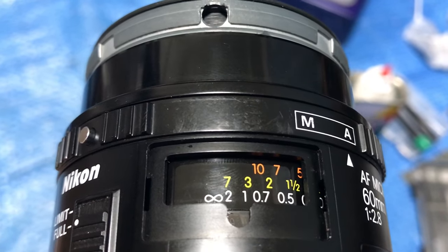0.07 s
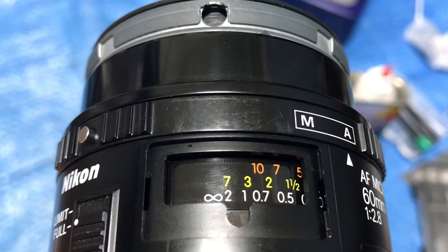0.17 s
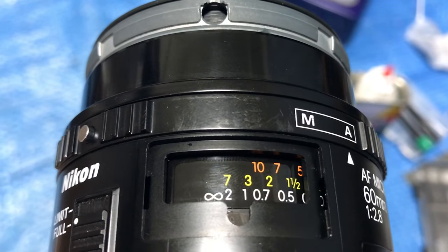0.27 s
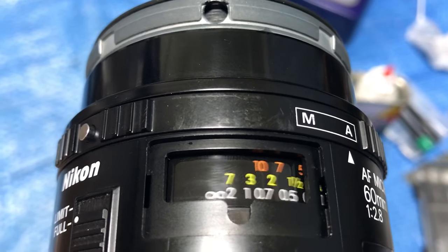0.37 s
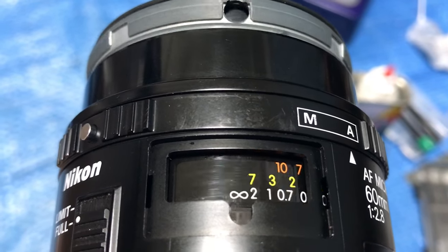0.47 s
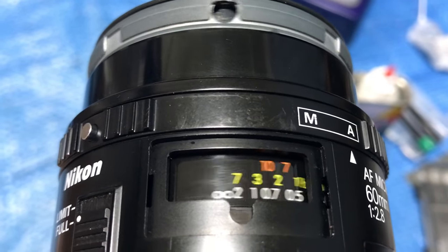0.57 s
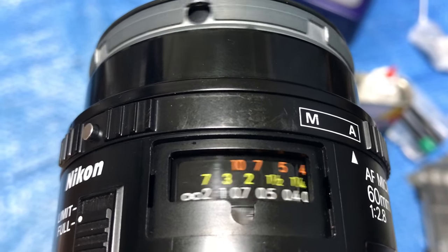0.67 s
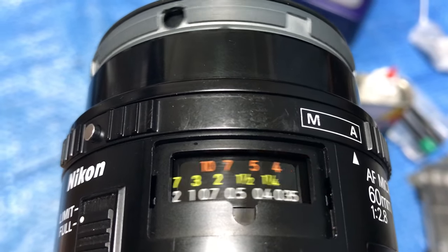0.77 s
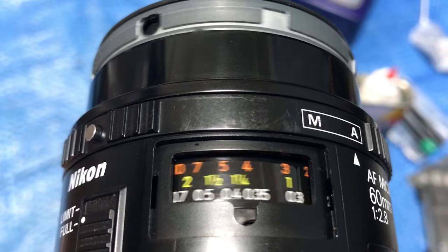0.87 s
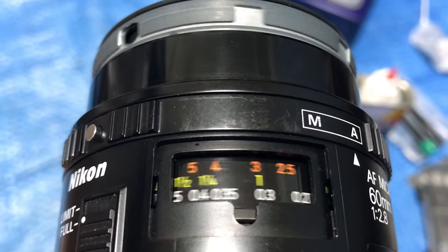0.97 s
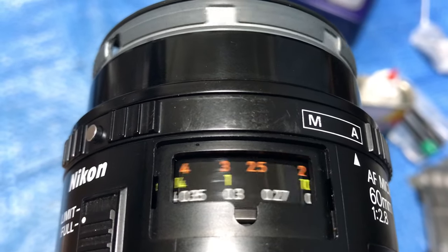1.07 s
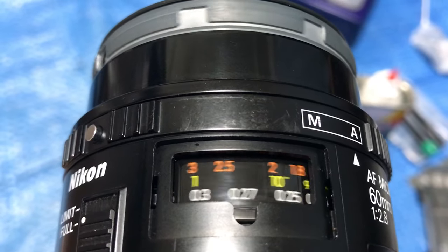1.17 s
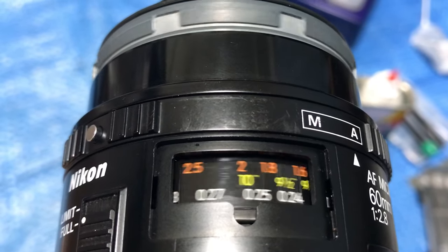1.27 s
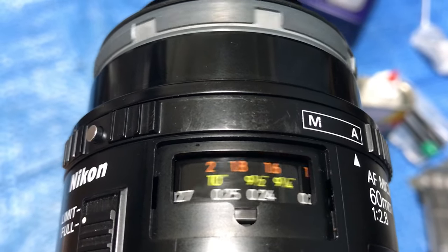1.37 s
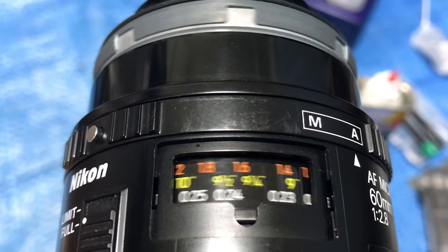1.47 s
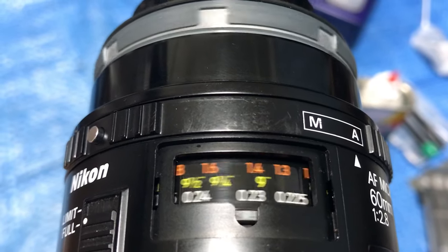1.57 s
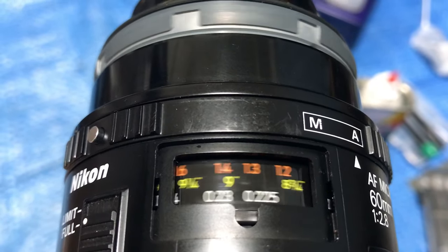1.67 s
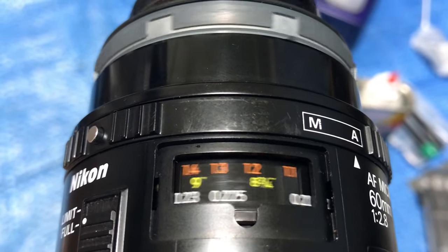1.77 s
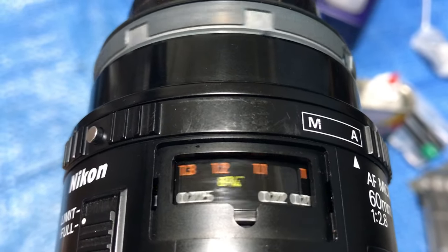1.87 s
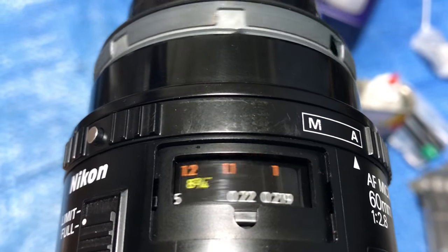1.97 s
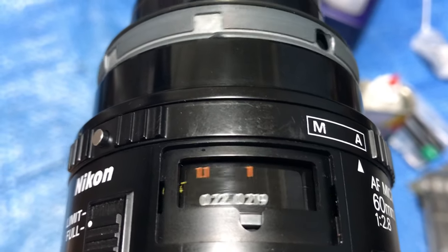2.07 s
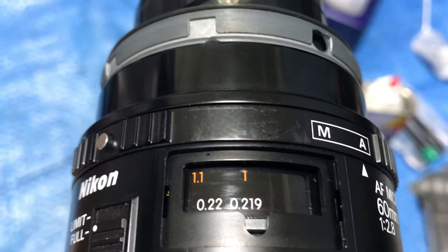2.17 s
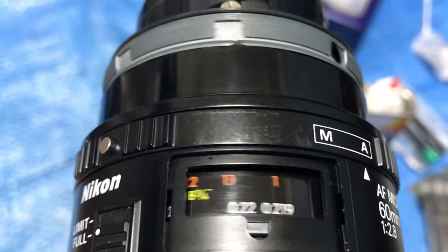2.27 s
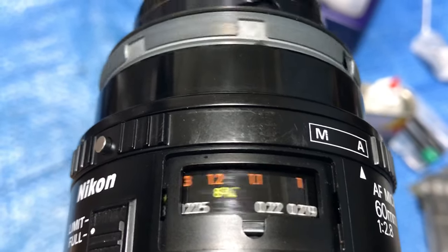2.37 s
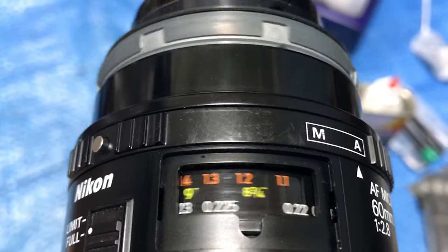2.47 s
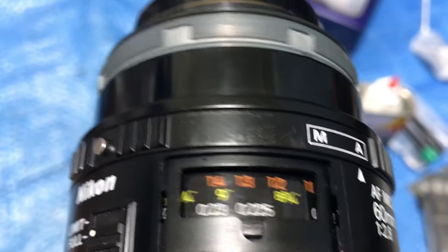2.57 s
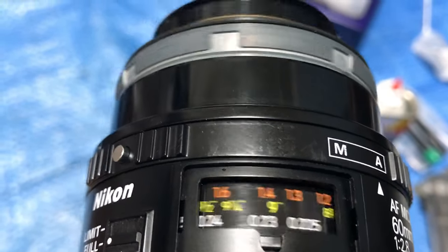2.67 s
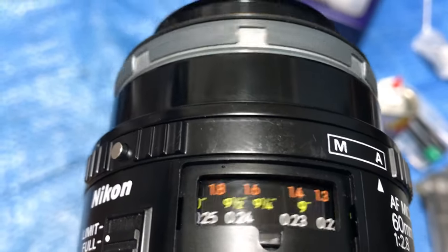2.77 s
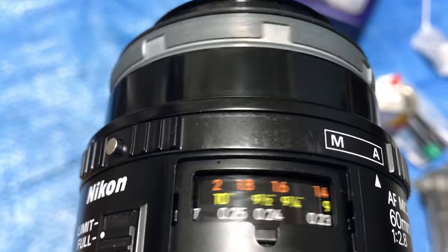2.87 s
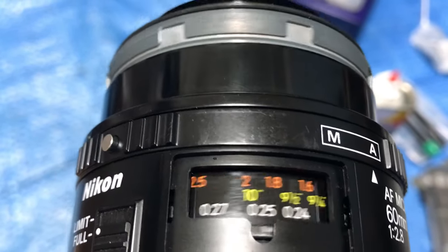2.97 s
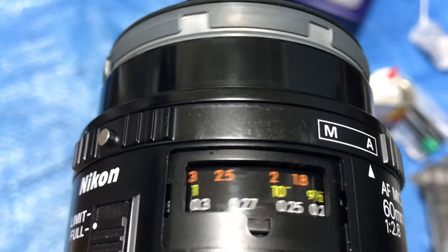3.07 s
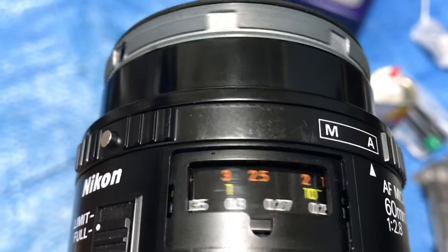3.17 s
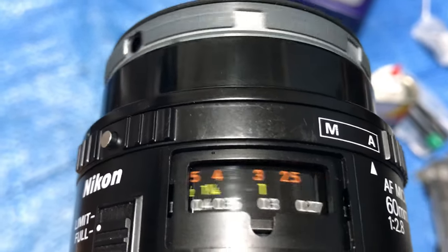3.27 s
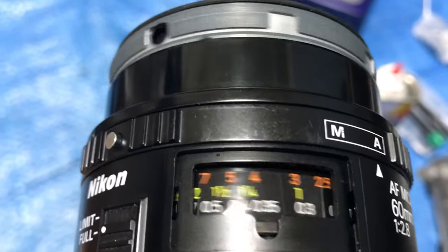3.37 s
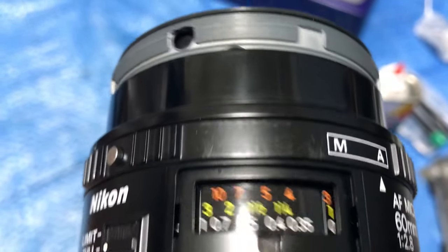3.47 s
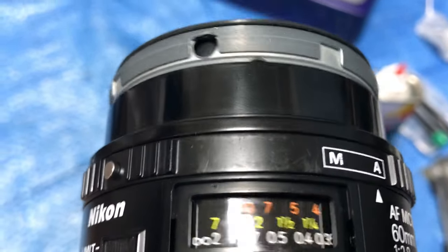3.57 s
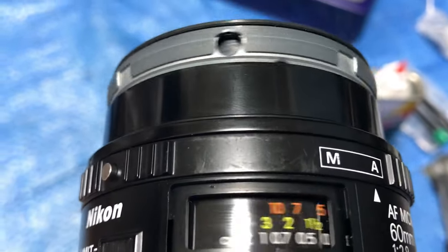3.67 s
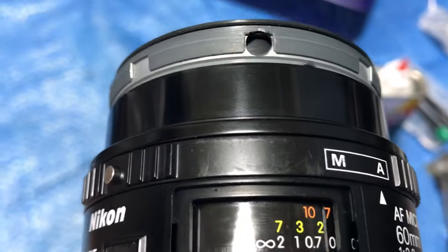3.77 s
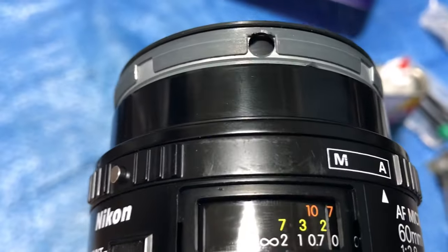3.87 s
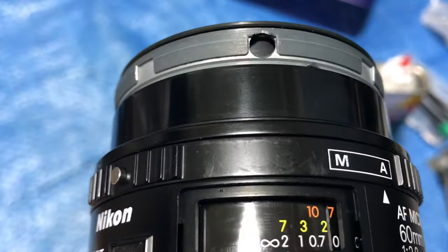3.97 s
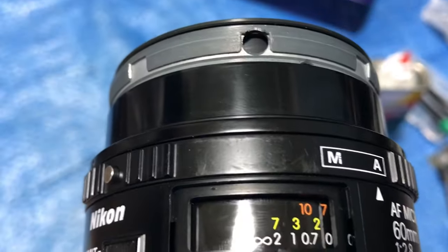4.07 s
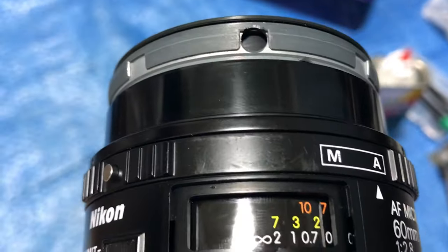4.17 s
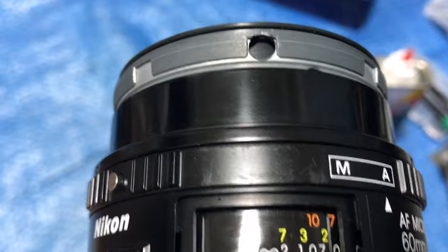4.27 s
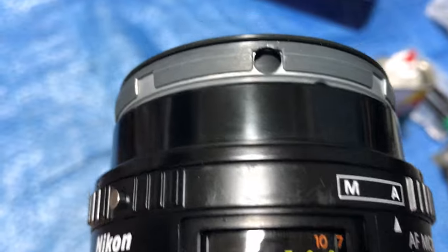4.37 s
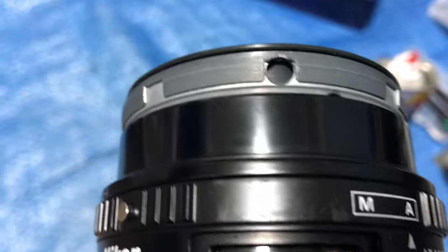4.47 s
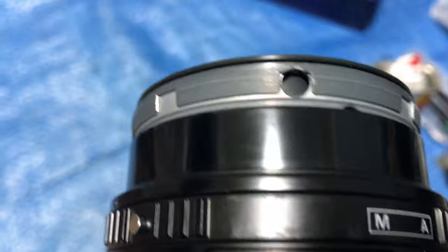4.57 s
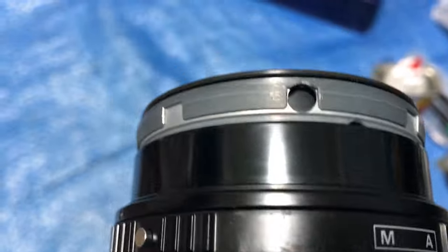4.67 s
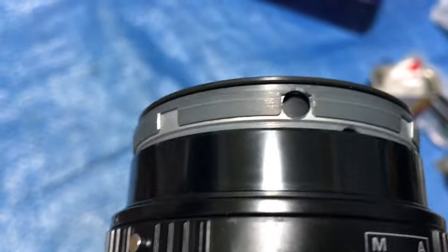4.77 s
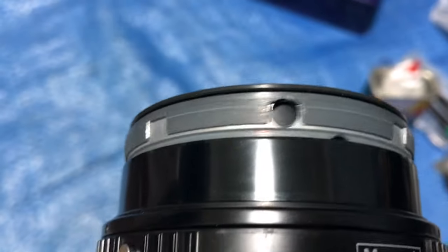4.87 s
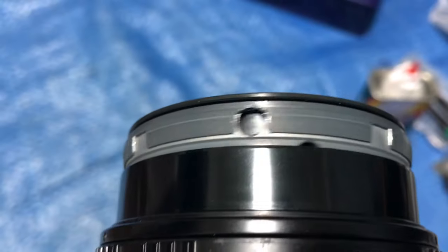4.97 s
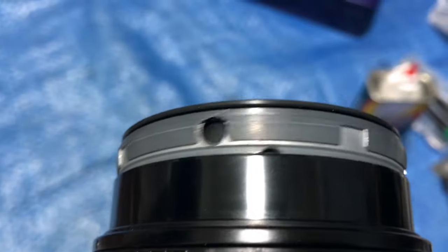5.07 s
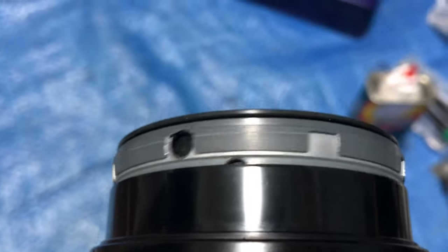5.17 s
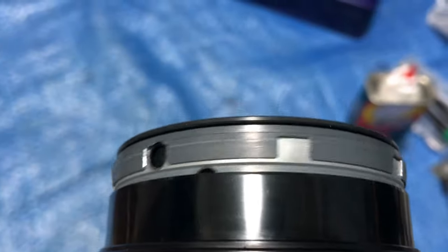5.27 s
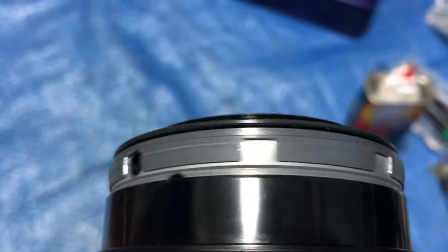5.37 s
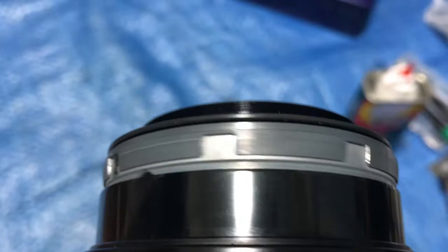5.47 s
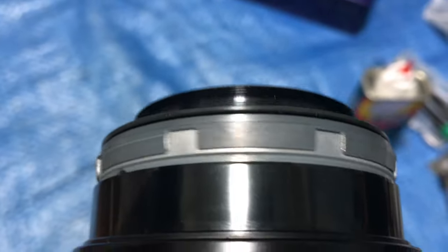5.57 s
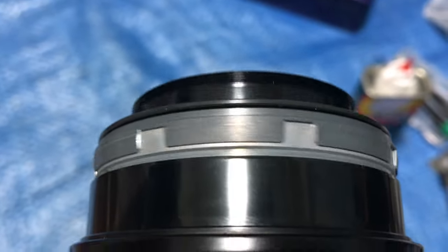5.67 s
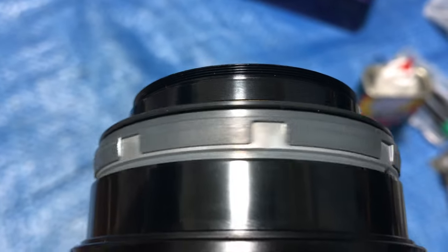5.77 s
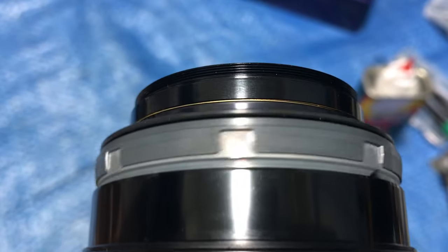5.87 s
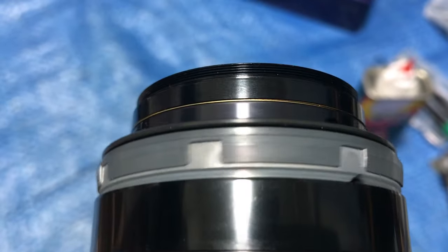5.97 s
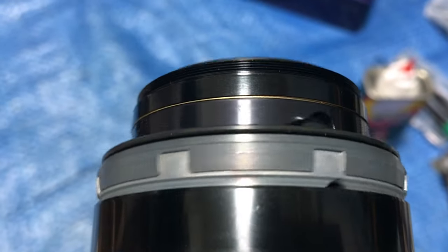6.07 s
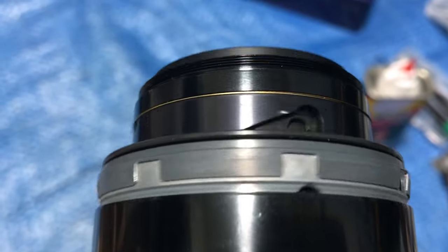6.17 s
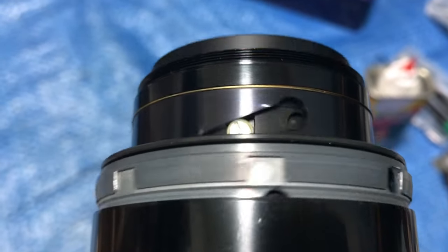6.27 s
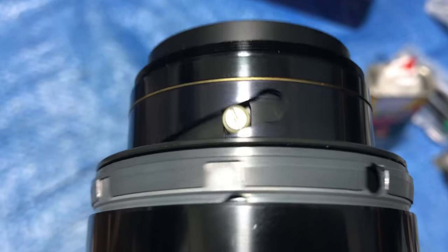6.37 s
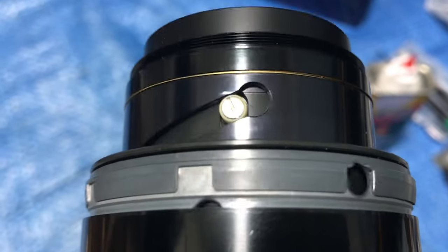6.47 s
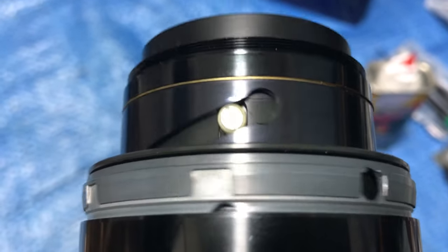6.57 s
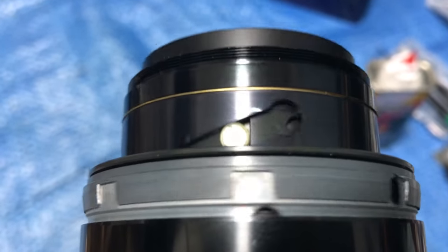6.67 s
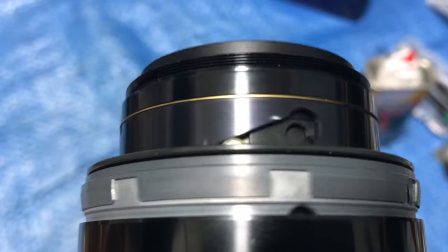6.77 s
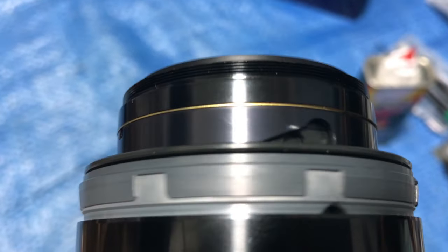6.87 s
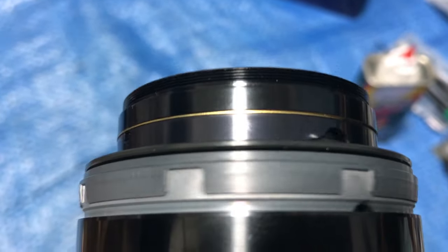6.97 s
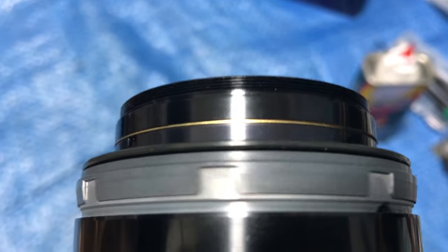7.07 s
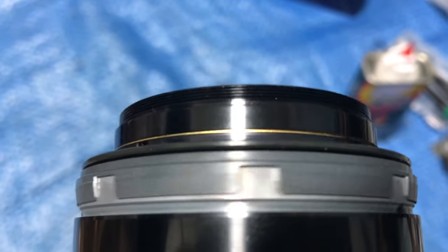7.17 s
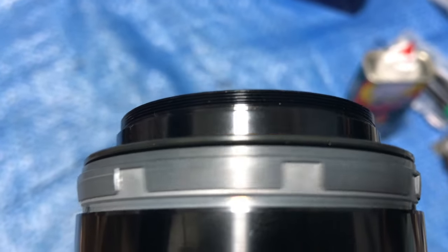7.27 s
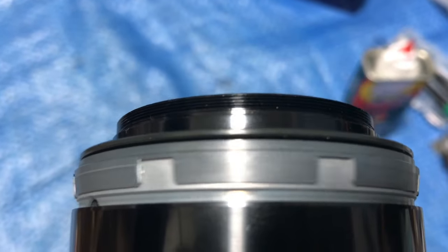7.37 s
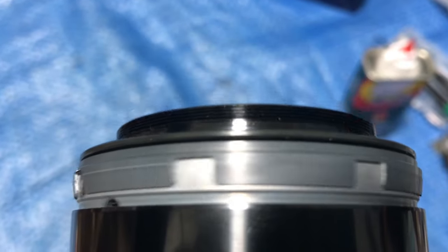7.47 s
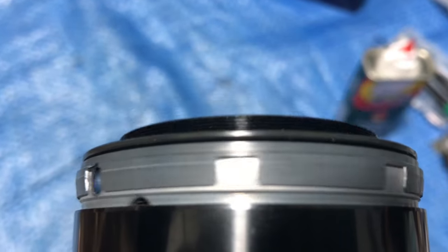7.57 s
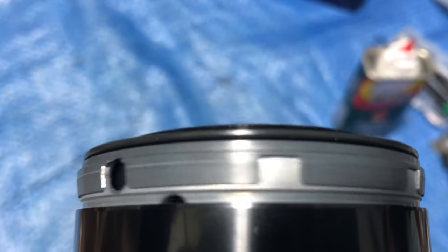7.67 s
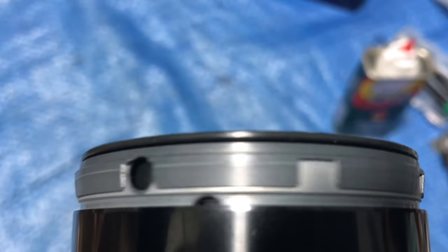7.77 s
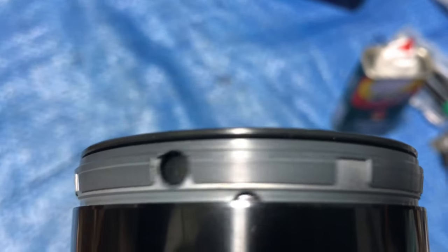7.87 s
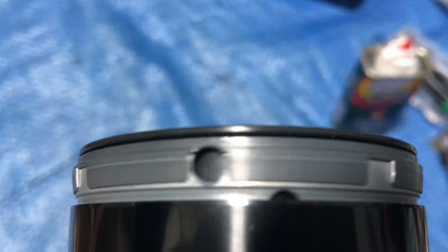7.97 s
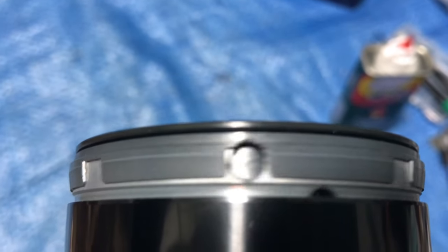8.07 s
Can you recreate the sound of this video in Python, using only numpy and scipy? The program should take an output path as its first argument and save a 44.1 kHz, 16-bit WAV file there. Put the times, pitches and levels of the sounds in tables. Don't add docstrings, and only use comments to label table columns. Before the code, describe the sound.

Close to a mono microphone in a quiet place, a camera lens focus motor wakes with a tick and a hard clack, then whirs outward at one steady speed. It knocks on its stop, rattles briefly, and whirs back to another sharp knock. After about a second of near silence with tiny ticks, the same out-and-back cycle repeats, still whirring near the end. Low distant rumble lies underneath.

```python
import sys
import numpy as np
from scipy import signal
from scipy.fft import rfft, irfft
from scipy.io import wavfile
from scipy.ndimage import uniform_filter1d

SR = 44100
rng = np.random.default_rng(int(sys.argv[2]) if len(sys.argv) > 2 else 0)


def generate_wav(sig):
    pcm = np.round(np.clip(np.atleast_2d(sig).T, -1, 1) * 32767).astype(np.int16)
    wavfile.write(sys.argv[1], SR, pcm)


def decibels_to_gain(level_db):
    exponent = np.asarray(level_db, float) / 20
    return 10 ** exponent


N = 358091
TIME = np.arange(N) / SR

SHAFT_HZ, IDLER_HZ, TEETH = 213.07, 370.06, 15
RUN_ENDS = [2.25, 4.4, 6.6]
# start and stop in seconds, rubbing level in dB,
# then the ring of the barrel's front in dB as the run begins and as it ends.
RUNS = [
    (0.665, 2.21, -41, -13, -7),
    (2.32, 3.871, -43, -15, -14.5),
    (5.005, 6.55, -41, -13.5, -14),
    (6.66, 8.14, -42, -14, -12),
]
# pitch in Hz, width in Hz, then level in dB in each of the four runs.
BARREL = [(310, 290, -7.5, -9.5, -6.5, -9.5), (805, 213, -2.5, -1.5, 1, -0.5),
          (1205, 450, -4.5, -0.5, -2.5, -1.5), (1876, 400, -4, 0, -2.5, -1),
          (2226, 200, -2, -12.5, 0, -4.5), (2920, 580, -2.5, 0, -0.5, -1.5), (3330, 160, -3, -2, -6, -7),
          (3770, 840, -1.5, -1, 4, 1.5), (4447, 450, -1, 6, -2, -12), (5250, 1070, -3, -4, -6.5, -7.5),
          (5800, 280, -6.5, -3, -0.5, -5), (6434, 610, -1, -11, 3, 2), (7330, 1800, -8.5, -8.5, -7, -8),
          (8400, 447, -6, -8.5, -5.5, -33.5), (9210, 980, -9, -12, -5.5, -6),
          (11900, 3000, -19.5, -17, -32, -35.5), (12000, 1400, -12, -15.5, -12, -24),
          (13400, 2500, -17, -16.5, -33, -13), (13450, 783, -22.5, -14, -12, -31),
          (15100, 537, -44.5, -26, -13.5, -27)]
BARREL_GROWTH = [(3, 4, 3, 7), (8.5, 6, 0, -2), (-5, -4, 0, -4.5), (1, -4, -1, -0.5), (4.5, 4.5, 11, 4),
                 (4, -2, -1.5, -1.5), (-6, 3, -13, 8), (2.5, -2.5, 0.5, -4), (0, 0, 0, 0), (-2, -2, 1, 0),
                 (-10, -3.5, -8, -2.5), (-4, 5, 4, 0), (5.5, -3, -1.5, -4), (-5.5, 8, 11, -3),
                 (6.5, -3.5, 5, 0), (2, -3, 2, -3), (0, -2.5, 2, -2), (-0.5, 1, 3, -5),
                 (-3.5, 3.5, -1.5, -4), (3.5, -7, 4, -1)]
FRONT_RING = 8
# time in seconds, tooth tone in dB, the tone an octave above in dB.
MESH = [
    [(0.665, -58, -68), (0.75, -50, -55), (0.98, -52.5, -51.5), (1.06, -71, -57), (1.3, -67, -66),
     (1.52, -56, -58), (2.1, -69, -58)],
    [(2.32, -64, -78), (2.9, -68, -80), (3.06, -57.5, -79), (3.43, -55, -77), (3.8, -60, -78)],
    [(5.005, -53, -65), (5.2, -49, -54), (5.45, -53.5, -54), (5.8, -53, -73), (5.96, -54, -54),
     (6.5, -55, -58)],
    [(6.66, -75, -78), (7.1, -61, -74), (7.55, -57, -59), (7.7, -53, -59), (8.12, -57, -65)],
]
RUB_PER_MESH = 0.02
# stop time in seconds, then coast, pause, take-up and whine levels in dB.
REVERSALS = [
    (0.549, -49, -54, -43, -60),
    (2.21, -48, -56, -43, -61),
    (4.884, -53, -53, -44, -58),
    (6.55, -47, -54, -41, -62),
]
LET_GO_S, COAST_S, COASTED_S, PAUSE_S, RESTART_S, TAKE_UP_S = .012, .026, .041, .051, .063, .077
LET_GO_DB, RESTART_DB = 3, -46
# time in seconds, rubbing level in dB.
WAKES = [
    (0.441, -80),
    (0.452, -42),
    (.474, -50),
    (0.492, -40.5),
    (0.544, -43),
    (4.853, -84.5),
    (4.865, -43),
    (4.878, -49),
]
PARK_S, PARK_WHINE_DB = 3.87, -55
# seconds after parking, rubbing level in dB.
WIND_DOWN = [
    (.013, -44),
    (.045, -53.5),
    (.094, -54),
    (.13, -69),
    (.164, -63),
    (.19, -81),
]
# multiple of its speed, then level in dB in each of the four runs.
SHAFT_TONES = [(1, -68, -74, -74, -74), (3, -72, -71, -66, -70), (4, -75, -62, -71, -70),
               (6, -71, -65, -68, -66), (7, -60, -61, -62, -62), (8, -64, -62, -70, -72),
               (9, -56, -64, -66, -60), (11, -63, -66, -62, -66), (12, -64, -72, -63, -66),
               (13, -62, -60, -71, -69), (14, -62, -69, -64, -67), (16, -59, -62, -56, -59),
               (17, -62, -67, -63, -64), (18, -61, -63, -57, -71), (19, -67, -65, -60, -61),
               (20, -61, -68, -63, -58), (21, -60, -67, -67, -69), (22, -61, -67, -68, -67)]
# multiple of its speed, then level in dB in each of the four runs.
IDLER_TONES = [(2, -64, -68, -67, -66), (5, -63, -67, -68, -66), (6, -68, -72, -62, -74),
               (8, -64, -70, -60, -76), (10, -64, -64, -58, -56), (15, -65, -63, -68, -67)]
# dB going out, dB coming back.
SHAFT_GROWTH = [(-1, -3), (3, -2), (5, 4), (-11, 5), (-2, 4), (-15, 15), (5, 2), (8, 9), (7, 4), (8, 4),
                (-11, -2), (0, 3), (2, -2), (6, -1), (-5, 15), (2, 11), (-9, 9), (2, 7)]
# dB going out, dB coming back.
IDLER_GROWTH = [(7, 11), (0, -3), (5, 6), (0, 4), (-3, 9), (-15, 12)]
# pitch in Hz, then level in dB in each of the four runs.
SIDE_TONES = [(382.7, -76, -73, -76, -70), (588.8, -76, -74, -76, -74), (1148.2, -67, -66, -68, -69),
              (1419, -74, -65, -74, -67), (2691.5, -65, -60, -64, -58), (3155.5, -64, -63, -59, -64),
              (3236.2, -61, -67, -59, -63), (3452.6, -65, -65, -65, -63), (3659.1, -67, -66, -66, -59),
              (3874.9, -69, -73, -61, -71), (3913.9, -70, -75, -63, -68), (4220.6, -76, -75, -75, -61),
              (4502.4, -58, -76, -61, -72), (6475.7, -64, -76, -63, -71)]
TONE_DRIFT_DB = 2.1
TONE_BUILD_DB, TONE_BUILD_S = -3, 0.089
# middle in seconds, half length in
# seconds, pitch in Hz, width in Hz, level in dB.
SQUEALS = [(0.521, 0.036, 3240, 500, -45), (0.664, 0.032, 3280, 300, -45.5),
           (1.328, 0.11, 4470, 160, -48.5), (2.951, 0.092, 3520, 600, -50.5), (5.047, .05, 3260, 300, -47),
           (5.65, 0.071, 3440, 700, -53), (6.692, 0.069, 3850, 260, -46.5), (7.419, 0.22, 3700, 300, -47),
           (1.622, 0.086, 4440, 200, -54), (2.65, 0.31, 5620, 300, -55), (3.3, .3, 5530, 250, -55),
           (4.28, .06, 3000, 1800, -75), (7.25, 0.17, 4500, 300, -52.5), (6.901, .2, 370, 60, -67)]
# time in seconds, peak in dB, ring in Hz,
# time for the ring to fall 60 dB in seconds, thud in dB against the peak.
TICKS = [(.4442, -36, 4650, .006, -20), (.5486, -10, 4550, .003, -16), (.5541, -23, 3250, .008, -10),
         (2.2105, -19, 4460, .006, -14), (2.2136, -16, 4300, .008, -10), (2.2695, -40, 5000, .006, -12),
         (3.8717, -11.5, 4660, .003, -19), (3.9135, -42, 4000, .008, -10), (3.9528, -44, 3500, .008, -6),
         (3.9874, -55, 4500, .008, -10), (4.0124, -49, 5000, .005, -20), (4.0224, -42, 3460, .007, -26),
         (4.023, -51, 2650, .012, -26), (4.2155, -57, 3210, .012, -14), (4.6065, -64, 4320, .008, -14),
         (4.8557, -46, 2900, .008, -20), (4.859, -35, 6500, .008, -30), (4.8706, -38, 2680, .008, -20),
         (4.8842, -21, 3660, .008, -14), (4.8903, -23, 3680, .008, -14), (4.9292, -43, 3600, .008, -12),
         (4.9709, -26, 4350, .008, -12), (6.5509, -17, 5800, .005, -14), (6.5542, -12, 6800, .009, -16),
         (6.6184, -28, 6800, .008, -4)]
# time in seconds, peak in dB, pitch in Hz.
SNAPS = [(.4585, -38, 12800), (.4715, -40, 12500), (4.8595, -38, 7000), (4.8805, -33, 8500),
         (.6158, -28, 8800), (.6366, -28, 8800), (1.9292, -37, 12000), (2.2771, -36, 10000),
         (2.288, -39, 11000), (3.936, -52, 9000), (4.0128, -53, 7800), (4.023, -52, 8000),
         (4.8706, -39, 8000), (4.9715, -25, 8800), (4.9564, -29, 7000), (5.3585, -37, 11000),
         (5.8602, -40, 12000), (5.9688, -33, 10000), (6.2775, -28, 11000), (6.6105, -42, 8500),
         (6.632, -35, 10000), (.4812, -39, 8500), (4.951, -42, 7000), (4.9675, -36, 14000),
         (4.977, -30, 11700), (4.9825, -30, 9500), (5.0055, -36, 9000), (4.1984, -64, 6000),
         (4.2314, -61, 6300), (3.996, -62, 9000), (4.8845, -29, 12000), (4.8878, -33, 9000),
         (.6285, -43, 11000)]
# time and length in seconds, level in dB, ring in Hz, thud in dB.
RATTLES = [(0.4765, 0.011, -43, 3500, -40), (0.5505, 0.0055, -33, 5800, -52),
           (0.632, 0.015, -39, 4300, -39), (2.2105, 0.0055, -23, 4400, -36), (2.279, 0.004, -43, 3500, -45),
           (2.29, 0.012, -42, 3800, -42), (3.8735, 0.005, -28, 5900, -50), (3.9235, 0.013, -53, 3000, -50),
           (4.8835, 0.011, -37, 3600, -51), (4.937, 0.007, -51, 1400, -53), (4.971, 0.014, -38, 3900, -44),
           (6.5505, 0.007, -25, 6300, -40), (6.631, 0.008, -41, 5300, -40)]
# pitch in Hz, level in dB per Hz.
KNOCK = [(680, -40), (1100, -8), (2200, -4.5), (4400, 0), (6400, -3), (8900, -7), (11300, -7.5),
         (16000, -19), (17000, -60)]
# pitch in Hz, time to fall 60 dB in seconds, level in dB.
THUD = [(1200, .012, -10), (880, .022, 0), (600, .014, -1), (360, .022, -2)]
# time in seconds, peak in dB, pitch in Hz, time to fall 60 dB in seconds.
RINGS = [(.5488, -28, 2370, 0.042), (.5495, -26, 3400, 0.025), (.551, -37, 360, 0.026),
         (.553, -30, 6300, 0.022), (.549, -27, 8800, .012), (.633, -43, 980, 0.024),
         (2.211, -28.5, 2300, 0.037), (2.211, -28, 3240, .02), (2.212, -31, 1250, 0.045),
         (3.8718, -29, 2230, 0.028), (3.8725, -21, 3390, 0.02), (3.873, -31, 1000, 0.027),
         (3.874, -43, 250, 0.038), (3.872, -22, 6420, .015), (4.885, -36, 2100, .02),
         (4.971, -36.5, 1230, .04), (4.9815, -32, 1170, 0.031), (4.975, -34, 2300, 0.048),
         (4.973, -33, 3150, .03), (4.981, -27, 4700, .025), (6.552, -23, 4120, 0.027),
         (6.553, -25, 3000, .025), (6.555, -34, 1020, 0.07), (6.552, -31, 1540, 0.012),
         (2.213, -32.5, 620, 0.031), (3.876, -33.5, 1500, .02), (3.873, -32, 2000, .015),
         (3.872, -30, 8260, 0.011), (3.872, -30, 10000, .01), (.481, -34, 3900, .02),
         (4.985, -38, 460, .03), (6.634, -28.5, 350, 0.02), (6.632, -34, 970, 0.036),
         (6.637, -34, 3950, .04)]
RING_RISE_S = 0.00031
WHINE_AFTER_S, WHINE_S, WHINE_FROM_HZ, WHINE_TO_HZ = 0.013, 0.032, 975, 1085
# multiple of the base pitch, level in dB.
WHINE = [(2, -9), (4, -7), (6, 0), (7, -14), (10, -23), (12, -18), (13, -15)]
# pitch in Hz, level in dB per Hz.
ROOM = [(12, -28), (20, -14), (36, -22), (60, -3), (77, -12), (91, -16), (104, -11), (123, -25), (163, -21),
        (485, -30.5), (1260, -31), (2020, -36), (4810, -46), (14700, -51), (16000, -50.5)]
ROOM_DB, DEEP_DB, UPPER_DB = -62.5, -64.5, -66.5
# middle and half length in seconds, deep rise in dB, upper rise in dB.
SWELLS = [
    (0.588, 0.084, 16, 5),
    (2.24, 0.07, 7, 5.5),
    (3.6, 0.41, 6, 4),
    (6.1, 0.66, 13, 5),
    (7.19, 0.58, 7.5, 8.5),
    (8.1, 0.19, 0, 10.5),
]
# time in seconds, level in dB.
SLIDE = [
    (3.97, -59),
    (4.0, -67),
    (4.1, -63.5),
    (4.19, -64.5),
    (4.23, -71),
    (4.5, -72),
    (4.85, -72),
]
# time in seconds, level in dB.
MURMUR = [
    (0, -85),
    (.3, -90),
    (.5, -75.5),
    (4.3, -81.5),
    (8.2, -78),
]


def evened(x):
    return x / np.sqrt(np.mean(x ** 2) + 1e-20)


def coloured(x, points):
    f, db = np.transpose(points)
    hz = np.fft.rfftfreq(len(x), 1 / SR)
    colour = decibels_to_gain(np.interp(np.log(hz + 1), np.log(f + 1), db))
    return evened(irfft(rfft(x) * colour, len(x)))


def curve(rows, column=1, t=TIME):
    return np.interp(t, [r[0] for r in rows], [r[column] for r in rows])


def wander(count, t, hz):
    f = np.geomspace(hz / 10, hz, 12)[:, None]
    drifts = []
    for phase in rng.random((count, 12)):
        waves = np.sin(2 * np.pi * (f * t + phase[:, None])) / np.sqrt(f)
        drifts.append(evened(waves.sum(0)))
    return np.array(drifts)


def ring(x, hz, t60):
    r = decibels_to_gain(-60 / (max(t60, .001) * SR))
    return signal.lfilter([1], [1, -2 * r * np.cos(2 * np.pi * hz / SR), r * r], x)


def band(hz, width):
    once = ring(rng.standard_normal(N), hz, 3.5 / width)
    return evened(ring(once, hz, 3.5 / width))


def add(mix, s, sound):
    part = mix[round(s * SR):][:len(sound)]
    part += sound[:len(part)]


def load():
    points = WAKES + [(PARK_S + s, db) for s, db in WIND_DOWN]
    for stop, coast, pause, take_up, _ in REVERSALS:
        points += [(stop + LET_GO_S, coast + LET_GO_DB), (stop + COAST_S, coast),
                   (stop + COASTED_S, coast - 1), (stop + PAUSE_S, pause),
                   (stop + RESTART_S, RESTART_DB), (stop + TAKE_UP_S, take_up)]
    points = [(s, db - 2) for s, db in points]
    for (start, stop, db, *_), mesh in zip(RUNS, MESH):
        mesh = mesh + [(stop, mesh[-1][1])]
        usual = np.mean([row[1] for row in mesh])
        points += [(row[0], db + RUB_PER_MESH * (row[1] - usual)) for row in mesh]
    return sorted(points)


def rubbing():
    turn = 2 * np.pi * SHAFT_HZ * TIME
    grit = decibels_to_gain(1.9 * rng.standard_normal(N))
    press = 1 + 0.14 * np.cos(turn) + 0.098 * np.cos(2 * turn)
    drive = rng.standard_normal(N) * grit * press
    hz, t, z = signal.stft(drive, SR, nperseg=1024, noverlap=768)

    run = np.searchsorted(RUN_ENDS, t)
    start, stop = np.array(RUNS)[run, :2].T
    travel = np.clip((t - start) / (stop - start) - .5, -.5, .5)
    modes = np.array(BARREL)
    db = modes[:, 2:][:, run] + 1.3 * wander(count=len(modes), t=t, hz=3)
    db += np.array(BARREL_GROWTH)[:, run] * travel
    front = []
    for s, e, _, first, last in RUNS:
        front += [(s + 0.21, first), (s + 0.53, last), (e, last)]
    db[FRONT_RING] = 10.35 + 0.68 * curve(front, t=t)

    shape = 1 / (1 + (2 * (hz[:, None] - modes[:, 0]) / modes[:, 1]) ** 2) ** 1.38
    slip_db = np.clip(curve(load(), t=t) + 46, -6.5, 0)
    octaves = np.log2(np.clip(hz[:, None], 500, 4800) / 3000)
    power = shape @ decibels_to_gain(2 * db) * decibels_to_gain(1.3 * slip_db * octaves)
    patches = uniform_filter1d(rng.standard_normal(power.shape), size=5, axis=0)
    patches = uniform_filter1d(patches, size=30, axis=1)
    power *= decibels_to_gain(2 * 1.8 * evened(patches))
    rung = signal.istft(z * np.sqrt(power / power.mean(0)), SR, nperseg=1024, noverlap=768)[1][:N]
    return evened(rung) * decibels_to_gain(-1.92 + curve(load()))


def gear_tones():
    out, mesh_hz = np.zeros(N), TEETH * SHAFT_HZ
    tones = np.vstack([SHAFT_TONES, IDLER_TONES, SIDE_TONES])
    counts = [len(SHAFT_TONES), len(IDLER_TONES), len(SIDE_TONES)]
    tone_hz = tones[:, 0] * np.repeat([SHAFT_HZ, IDLER_HZ, 1], counts)
    growth = np.vstack([SHAFT_GROWTH, IDLER_GROWTH, np.zeros((len(SIDE_TONES), 2))])
    for run, ((start, stop, *_), mesh) in enumerate(zip(RUNS, MESH)):
        t = np.arange(start - .022, stop, 1 / SR)
        slow = t[::200]
        travel = np.clip((slow - start) / (stop - start) - .5, -.4, .4)
        db = tones[:, [1 + run]] + growth[:, [run % 2]] * travel - 0.5
        db += TONE_DRIFT_DB * wander(count=len(tones), t=slow, hz=16)
        db += TONE_BUILD_DB * np.exp(-(slow - slow[0]) / TONE_BUILD_S)
        tooth_db = curve(mesh, column=1, t=slow) + 3.9
        octave_db = curve(mesh, column=2, t=slow) + 1.24
        lag = 0.0029 * wander(count=1, t=slow, hz=14)[0] / SHAFT_HZ
        t_shaft = t + np.interp(t, slow, lag)
        sound = np.zeros(len(t))
        for f, d in zip([*tone_hz, mesh_hz, 2 * mesh_hz], [*db, tooth_db, octave_db]):
            sound += np.interp(t, slow, decibels_to_gain(d)) * np.sin(2 * np.pi * (f * t_shaft + rng.random()))
        add(out, t[0], np.sqrt(2) * sound * np.clip((t - t[0]) / .02, 0, 1))
    return out


def squeals():
    out = np.zeros(N)
    for s, half, hz, width, db in SQUEALS:
        t = np.arange(-2 * half, 2 * half, 1 / SR)
        sung = evened(ring(rng.standard_normal(2 * SR), hz, 2.2 / width))
        add(out, s + t[0], decibels_to_gain(db) * np.exp(-(t / half) ** 4) * sung[-len(t):])
    return out


def knock(burst, hz, t60, modes):
    direct = coloured(burst, KNOCK)
    bright = evened(.9 * direct + evened(ring(direct, hz, t60)))
    push = np.gradient(burst)
    thud = sum(decibels_to_gain(db) * evened(ring(push, f, decay)) for f, decay, db in modes)
    return bright, evened(thud)


def knocks():
    out, t = np.zeros(N), np.arange(-200, 2800) / SR
    contact = np.maximum(t, 0) * np.exp(-abs(t) / .00045)
    for s, db, hz, t60, thud_db in TICKS:
        burst = rng.standard_normal(len(t)) * contact
        bright, thud = knock(burst, hz, t60, THUD[:2])
        tick = bright / abs(bright).max() + decibels_to_gain(thud_db) * thud / abs(thud).max()
        add(out, s + t[0], decibels_to_gain(db) * tick)
    for s, db, hz in SNAPS:
        crack = np.diff(rng.standard_normal(len(t) + 2), n=2) * contact
        snap = evened(crack) + .9 * evened(ring(crack, hz, .004))
        add(out, s + t[0], decibels_to_gain(db) * snap / abs(snap).max())
    for s, length, db, hz, thud_db in RATTLES:
        grip = np.clip(t / (.12 * length), 0, 1) * np.clip(1 - .4 * t / length, 0, 1)
        grip *= np.exp(-np.maximum(t - length, 0) / .0015)
        uneven = decibels_to_gain(2.0 * rng.standard_normal(len(t)))
        bright, thud = knock(rng.standard_normal(len(t)) * uneven * grip, hz, .005, THUD)
        rattle = decibels_to_gain(db - 1.5) * bright + decibels_to_gain(thud_db + .6) * thud
        add(out, s + t[0], np.sqrt(length * SR / len(t)) * rattle)
    return out


def rings():
    out, t = np.zeros(N), np.arange(3000) / SR
    for s, db, hz, t60 in RINGS:
        level = decibels_to_gain(db - 60 * t / max(t60, .003)) * (1 - np.exp(-t / RING_RISE_S))
        add(out, s, level * np.sin(2 * np.pi * hz * t))
    return out


def whines():
    out = np.zeros(N)
    glide = np.linspace(0, 1, round(WHINE_S * SR)) ** 0.655
    turns = np.cumsum(WHINE_FROM_HZ + (WHINE_TO_HZ - WHINE_FROM_HZ) * glide) / SR
    for stop, *_, db in REVERSALS + [(PARK_S, PARK_WHINE_DB)]:
        flutter_db = 4 * wander(count=len(WHINE), t=turns / WHINE_TO_HZ, hz=150)
        tone = sum(decibels_to_gain(d + f) * np.sin(2 * np.pi * k * turns) for (k, d), f in zip(WHINE, flutter_db))
        add(out, stop + WHINE_AFTER_S, decibels_to_gain(db) * tone * signal.windows.tukey(len(turns), .4))
    return out


def room():
    hiss = decibels_to_gain(ROOM_DB + 1.0) * coloured(rng.standard_normal(N), ROOM)
    deep, upper = sum(np.outer(db, np.exp(-((TIME - s) / half) ** 2)) for s, half, *db in SWELLS)
    rumble = decibels_to_gain(DEEP_DB + deep - 4.5) * band(57.2, 30)
    rumble += decibels_to_gain(UPPER_DB + upper - 3.0) * evened(band(119.3, 13) + band(149, 49))
    slide_db = curve([(SLIDE[0][0] - .02, -99)] + SLIDE + [(SLIDE[-1][0] + .02, -99)])
    slide = decibels_to_gain(slide_db) * evened(band(1100, 400) + 0.95 * band(1400, 900))
    murmur = decibels_to_gain(curve(MURMUR)) * band(740, 450)
    return hiss + rumble + slide + murmur


def scene():
    motor = rubbing() + gear_tones() + squeals()
    impacts = knocks() + rings()
    return np.tile(motor + impacts + whines() + room(), (2, 1))


def roll_off(x):
    return signal.sosfilt(signal.butter(12, 16820, fs=SR, output="sos"), x)


def record(dry):
    limited = signal.oaconvolve(dry, signal.firwin(255, 16150, fs=SR)[None], "same")
    return roll_off(limited)


dry = scene()
out = record(dry)
generate_wav(out)
```